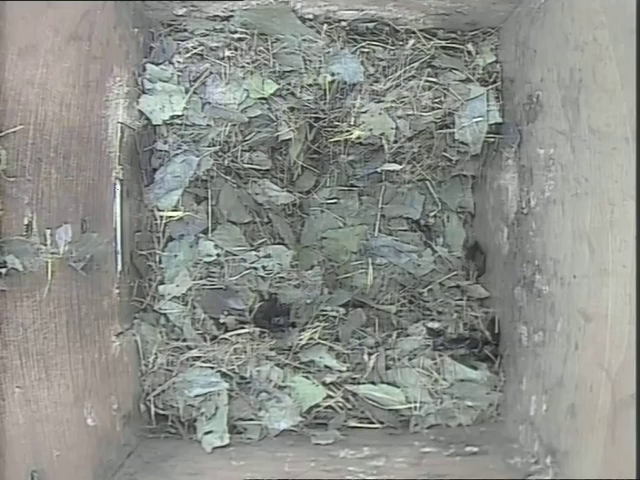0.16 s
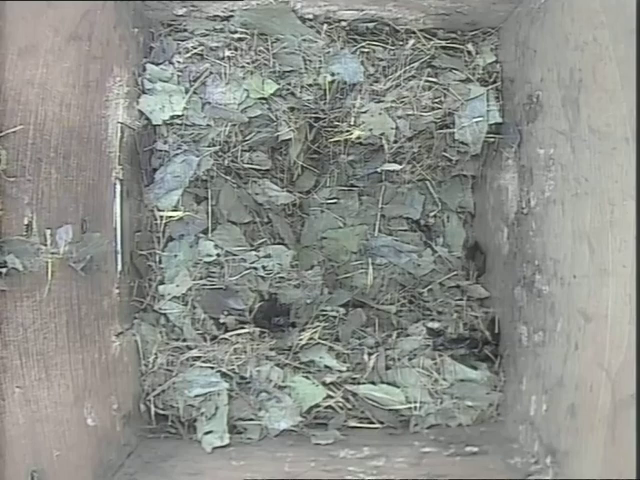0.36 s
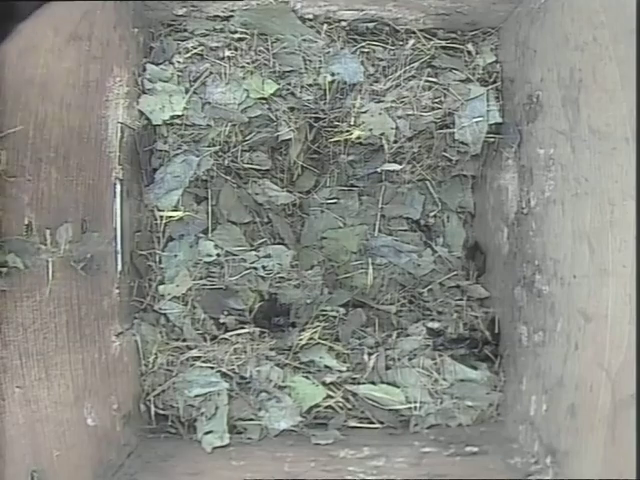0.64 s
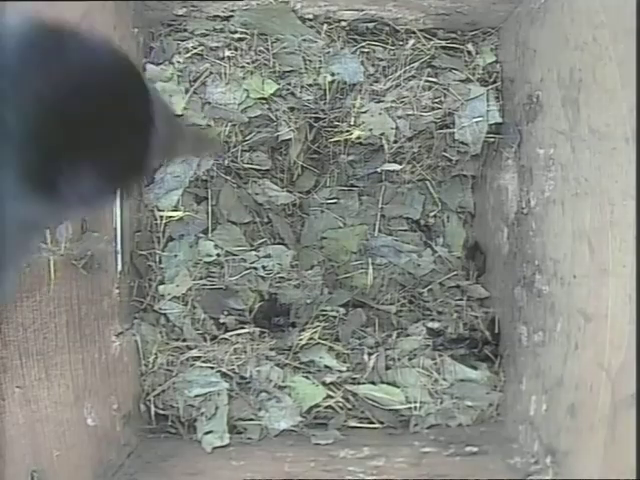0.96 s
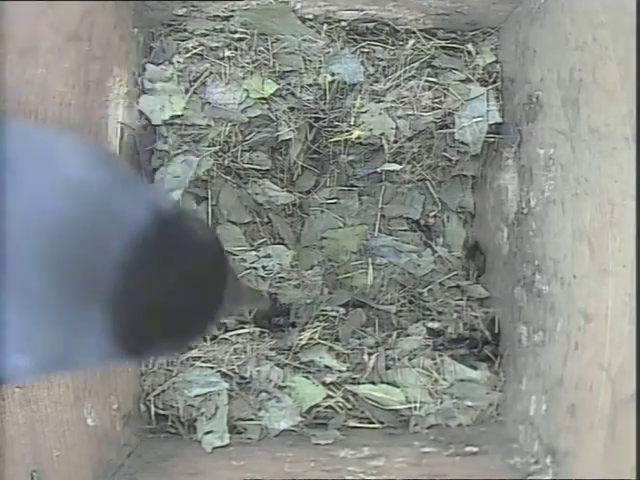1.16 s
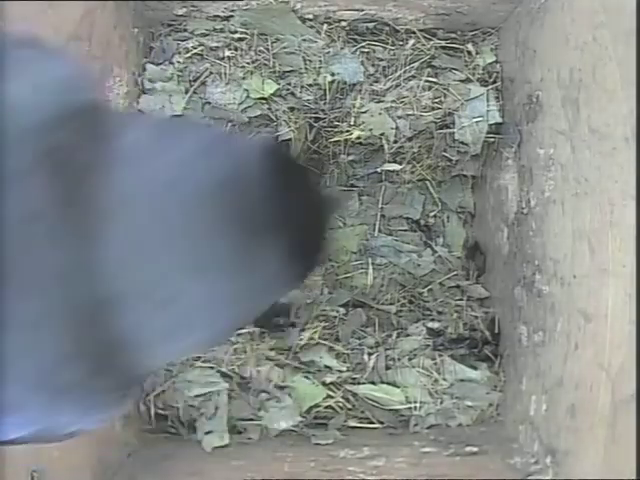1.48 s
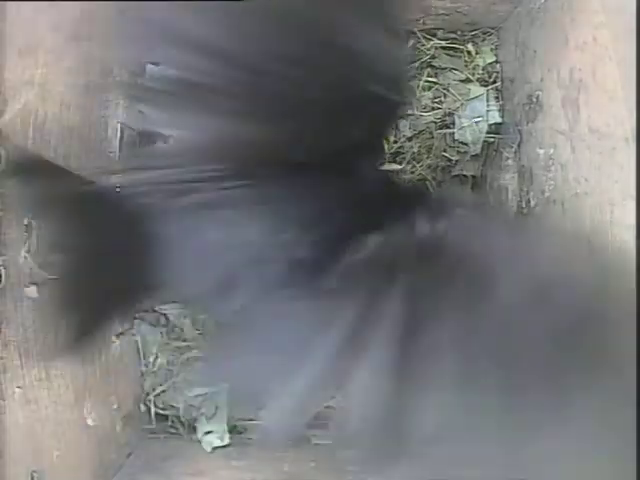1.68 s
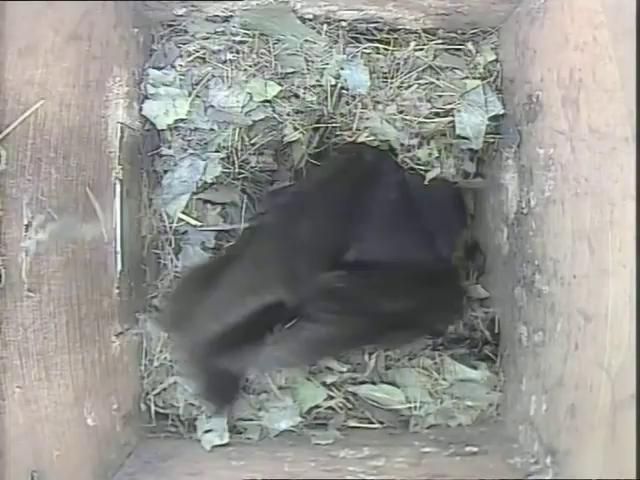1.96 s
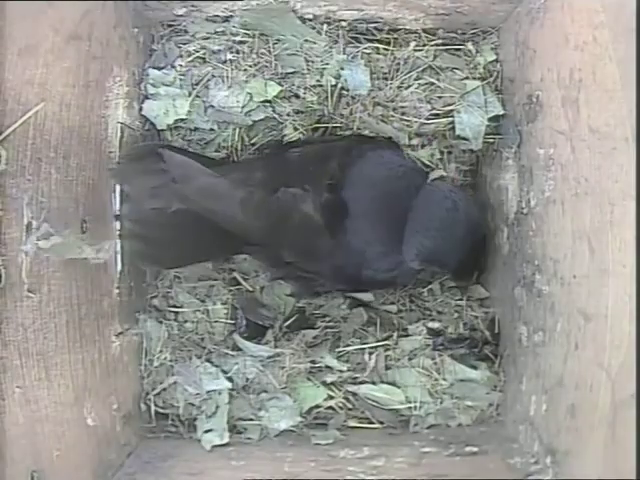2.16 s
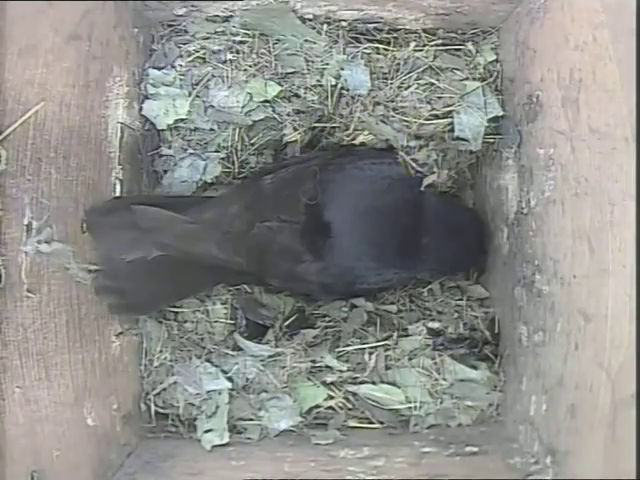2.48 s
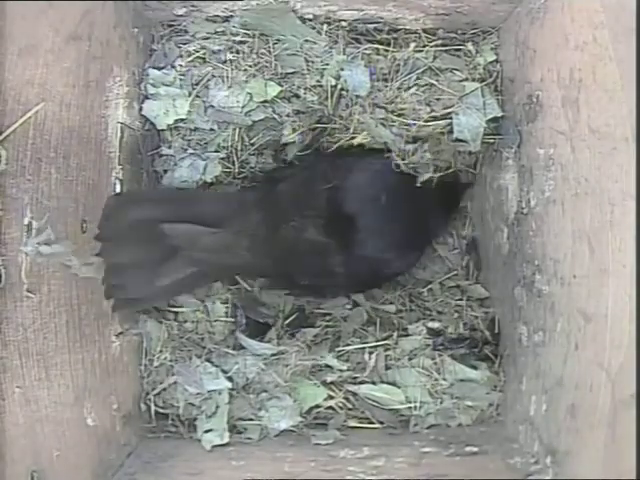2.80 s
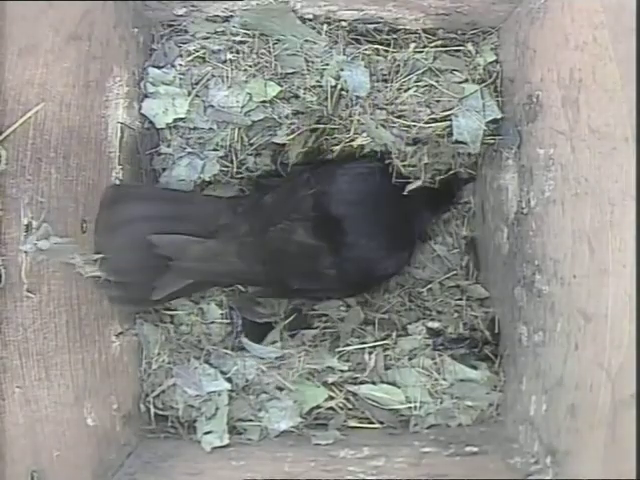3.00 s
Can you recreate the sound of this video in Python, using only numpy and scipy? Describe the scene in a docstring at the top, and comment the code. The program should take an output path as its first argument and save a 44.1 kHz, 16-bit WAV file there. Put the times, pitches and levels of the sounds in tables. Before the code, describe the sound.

A bird scrabbles into a small wooden nest box. After a brief initial silence, a sharp claw scratch and knock come at 0.25 s, then lighter scratches and soft thumps around 0.65-0.95. The loudest crackling flurry of claws, wings and dry leaves runs 1.45-1.95, with low body knocks. It settles, with small rustles near 2.3 and 2.9-3.1. Faint rising chirps and whistles outside until 1.45; steady hiss and rumble.

```python
"""Inside a wooden nest box: a bird lands at the hole, scrabbles in, flaps down onto dry leaves and settles.
Claws, feathers and leaves are showers of tiny clicks that ring the air and the thin walls of the box.
Knocks of feet and body are rough pushes that set low tones swinging and dying away.
Small birds chirp outside: gliding, fluttering sine notes with scattered echoes.
A cheap camera microphone under the lid adds hiss and rumble, made from filtered noise, and a constant offset."""
import sys
import numpy as np
from scipy import signal
from scipy.fft import rfft, irfft
from scipy.io import wavfile
from scipy.ndimage import uniform_filter1d

SR = 44100
rng = np.random.default_rng(int(sys.argv[2]) if len(sys.argv) > 2 else 0)


def to_wav(s):
    """Save 16-bit WAV."""
    ch = np.atleast_2d(s).T  # columns
    pcm = np.round(np.clip(ch, -1, 1) * 32767)  # PCM
    wavfile.write(sys.argv[1], SR, pcm.astype(np.int16))


def elevation(decibels):
    """Turn decibel levels (scalar or array-like) into linear amplitude ratios."""
    levels = np.asarray(decibels, float)
    return 10 ** (levels / 20)


N = 138474  # length in samples
BEFORE_S = 0.06  # time from the start of a swell to its peak


def unit(x):
    """Scale to rms 1."""
    return x / np.sqrt(np.mean(x ** 2))


def shape(x, db_of_hz):
    """Colour a sound by a gain in dB that depends on frequency."""
    hz = np.maximum(np.fft.rfftfreq(len(x), 1 / SR), 1)
    return irfft(rfft(x) * elevation(db_of_hz(hz)), len(x))


def points(table):
    """Gain in dB drawn through (Hz, dB) points, straight over log frequency."""
    hz, db = np.array(table, float).T
    return lambda f: np.interp(np.log(f), np.log(hz), db)


def curve(table, axis):
    """One column of a table as a curve over time."""
    rows = np.array(table, float)
    return np.interp(np.arange(N) / SR, rows[:, 0], rows[:, axis])


def add(out, at_s, x):
    """Mix a sound in at a time."""
    i = int(at_s * SR)
    out[i:i + len(x)] += x[:len(out) - i]


def ring(x, hz, width_hz):
    """One resonance, gain 1 at the centre."""
    return signal.lfilter(*signal.iirpeak(hz, hz / width_hz, fs=SR), x)


def walls(x):
    """The thin walls ring at their own pitches when rubbed or driven by noise."""
    # ringing walls: f/Hz, width/Hz, level/dB
    wall_modes = [(1255.7, 32, 2.5), (1427, 167, 7)]
    out = 0
    for hz, width_hz, db in wall_modes:
        keep_noise_level = np.sqrt(SR / np.pi / width_hz / 2)  # flat noise stays as strong as it was
        out = out + elevation(db) * ring(x, hz, width_hz) * keep_noise_level
    return out


def box_air(x):
    """Direct sound plus the standing waves of the air in the box."""
    # air resonances: f/Hz, width/Hz, level over the direct sound/dB
    air_modes = [(2312, 90, 1), (2880, 120, 6.5), (3170, 90, 0), (3574, 160, 1), (4600, 140, 0),
                 (5010, 320, 3), (6734, 640, -4)]
    return x + sum(elevation(db) * ring(x, hz, width_hz) for hz, width_hz, db in air_modes)


def grains(size):
    """Dense tiny clicks of uneven strength over some steady noise, as rough surfaces give when they rub."""
    clicks_per_s, spread_db, noise_share = 7000, 2.2, 0.35
    hit = rng.random(size) < clicks_per_s / SR
    strength = rng.standard_normal(size)
    boost_db = spread_db * np.minimum(rng.exponential(size=size), 2)
    return unit(hit * strength * elevation(boost_db) + noise_share * rng.standard_normal(size))


def swell(half_s):
    """Bell-shaped rise and fall, quicker up than down; the peak lies at BEFORE_S."""
    t = np.arange(6144) / SR - BEFORE_S
    side_s = max(half_s, 1e-3) * np.where(t < 0, 0.94, 1.3)
    return np.exp(-(t / side_s) ** 2)


def floor():
    """Hiss, outdoor noise ringing the walls, and a rumble that swells and sinks."""
    # colour of the steady noise: f/Hz, relative level per Hz/dB
    floor_colour = [(15, -36), (25, -8.5), (93, -6), (278, -12.5), (306, -12), (584, -18), (673, -19.5),
                    (1450, -22.5), (1670, -27.5), (7500, -36), (9750, -69), (16500, -120)]
    # strength of the bass: t/s, level/dB
    rumble_level = [(.12, -58.5), (1.5, -59.5), (1.6, -55.5), (1.8, -58.5), (1.88, -51), (2.0, -60),
                    (3.0, -61), (3.14, -55)]
    noise = unit(shape(rng.standard_normal(N), points(floor_colour))) * elevation(-57)
    low = signal.sosfiltfilt(signal.butter(2, 200, fs=SR, output="sos"), noise)
    hiss = noise - low
    rumble = unit(low) * elevation(curve(rumble_level, axis=1))
    outdoors = walls(rng.standard_normal(N)) * elevation(-71.5)
    return hiss + rumble + outdoors


def rustle():
    """Feathers and dry leaves: a flickering bed of grains that follows the bird's stirring."""
    # stirring: t/s, level before flicker and tilt/dB, bright half over dark half/dB
    stirring = [(.12, -66.5, -7), (.23, -51, -3), (.29, -63, -8), (.62, -59.5, -6), (.7, -51, -5),
                (.85, -55.5, -5), (.98, -59, 10), (1.03, -58.5, -5), (1.16, -58.5, -3.5),
                (1.2, -60.5, -6.5), (1.34, -57, -8), (1.5, -46.5, 0.5), (1.58, -46.5, -2), (1.8, -47.5, 2),
                (1.95, -49, -0.5), (2.05, -62.5, 10), (2.07, -62.5, 1), (2.34, -56, -2.5), (2.37, -66, -1),
                (2.8, -68, -5.5), (2.88, -53, -3), (2.95, -62.5, -2), (3.0, -51, -4.5), (3.14, -52, 0.5)]
    # colour of the grains: f/Hz, relative level per Hz/dB
    rustle_colour = [(530, -34.5), (900, -16.5), (1270, -12.5), (2590, -12.5), (4810, -8.5), (7500, -10),
                     (9750, -13), (16500, -120)]
    bed = unit(box_air(shape(grains(size=N), points(rustle_colour))))
    dark = signal.sosfilt(signal.butter(2, 4000, fs=SR, output="sos"), bed)
    bright = bed - dark
    slow_noise = uniform_filter1d(uniform_filter1d(rng.standard_normal(N), size=400), size=400)
    flicker_db = 1.6 * unit(slow_noise)
    level = elevation(curve(stirring, axis=1) + flicker_db)
    tilt_db = curve(stirring, axis=2)
    in_air = level * (dark * elevation(-tilt_db / 2) + bright * elevation(tilt_db / 2))
    in_walls = walls(level * elevation(-17.5) * grains(size=N))
    return in_air + in_walls


def scratches():
    """Claws and feathers: short bursts of grains, each with its own colour, in the air of the box."""
    # bursts: peak t/s, rms level at the peak before the box air/dB, centre f/Hz, half length before skew/s
    bursts = [(0.143, -45.5, 3350, 0.0036), (0.152, -43.5, 3830, 0.0065), (0.201, -49, 3340, 0.0024),
              (0.224, -45, 4950, 0.0024), (0.2503, -28, 4020, 0.0043), (0.256, -34.5, 2160, 0.0049),
              (0.528, -50, 4750, 0.0066), (0.644, -41.5, 4920, 0.0024), (0.667, -50, 4700, .005),
              (0.713, -54, 3350, 0.009), (0.726, -48.5, 5650, .004), (0.748, -44, 4640, 0.0043),
              (0.781, -36.5, 4440, 0.0081), (0.793, -39.5, 4650, 0.0049), (0.811, -51.5, 3680, 0.019),
              (0.937, -43.5, 3940, 0.0065), (1.06, -59, 3100, 0.0087), (1.095, -42.5, 3410, 0.0042),
              (1.107, -45, 4640, 0.0077), (1.146, -50, 4250, 0.003), (1.32, -45.5, 5870, 0.0015),
              (1.371, -41, 3100, 0.0046), (1.402, -47.5, 3100, 0.0027), (1.433, -44, 3340, 0.01),
              (1.452, -35.5, 4540, 0.0055), (1.48, -45, 3200, 0.0066), (1.508, -31, 5800, 0.0028),
              (1.533, -40, 4030, 0.0064), (1.546, -34.5, 4480, 0.0057), (1.559, -30.5, 4930, 0.0062),
              (1.566, -29.5, 3480, 0.0038), (1.593, -36.5, 4820, 0.0024), (1.6, -39, 4600, 0.0064),
              (1.626, -22, 5350, 0.0021), (1.64, -32, 4440, 0.013), (1.654, -27, 5850, 0.004),
              (1.686, -31.5, 4900, 0.0017), (1.692, -37, 4500, 0.0057), (1.718, -35, 4380, 0.011),
              (1.722, -33, 4840, .002), (1.734, -32.5, 4900, 0.0018), (1.867, -34, 6020, 0.017),
              (1.91, -43.5, 5640, 0.021), (2.296, -50.5, 6500, 0.0031), (2.344, -54.5, 2630, 0.003),
              (2.867, -49.5, 5260, 0.0078), (2.883, -52.5, 5600, 0.0067), (3.016, -38.5, 5660, 0.0033),
              (3.102, -45, 4820, 0.0022)]
    out = np.zeros(N)
    for peak_s, db, centre_hz, half_s in bursts:
        env = swell(half_s)

        def colour(f):
            octaves = np.where(f < centre_hz, 0.74, 0.65)  # wider below the centre
            return -6 * (np.log2(f / centre_hz) / octaves) ** 2

        burst = unit(shape(grains(size=len(env)), colour))
        add(out, peak_s - BEFORE_S, elevation(db) * env * burst)
    return unit(box_air(out)) * np.std(out)  # the resonances leave the overall level alone


def rubs():
    """Bursts of grains that ring the thin walls."""
    # rubs: peak t/s, rms level at the peak before the walls/dB, half length before skew/s
    rub_list = [(0.145, -54.5, 0.0096), (0.257, -54, 0.012), (0.784, -58, 0.022), (1.325, -51, 0.0013),
                (1.369, -50, 0.0063), (1.431, -52.5, 0.0076), (1.452, -50.5, 0.0075), (1.557, -54.5, 0.011),
                (1.642, -53.5, 0.015), (1.727, -54, 0.012), (1.804, -55, 0.0028), (1.868, -51.5, 0.012)]
    out = np.zeros(N)
    for peak_s, db, half_s in rub_list:
        env = swell(half_s)
        add(out, peak_s - BEFORE_S, elevation(db) * env * grains(size=len(env)))
    return walls(out)


def rising_chirp():
    """One near-sine note: the wavering pitch climbs, then holds while the sound drops and fades."""
    attack_s, rise_s, hold_s = 0.016, 0.047, 0.056
    from_hz, to_hz, waver_hz = 4400, 6050, 50  # the waver is an rms value
    t = np.arange(int((rise_s + hold_s) * SR)) / SR
    times = [0, attack_s, rise_s, rise_s + 0.0077, t[-1] - 0.01, t[-1]]
    env = np.interp(t, times, [0, 1, 1, elevation(-10), elevation(-10), 0])
    waver = unit(uniform_filter1d(rng.standard_normal(len(t)), size=130))
    hz = np.interp(t, [0, rise_s], [from_hz, to_hz]) + waver_hz * waver
    return env * np.sin(2 * np.pi * np.cumsum(hz) / SR)


def whistle(length_s, from_hz, to_hz):
    """One sine note that glides evenly between two pitches, with soft ends."""
    n = int(length_s * SR)
    hz = np.linspace(from_hz, to_hz, n)
    return signal.windows.tukey(n, 0.4) * np.sin(2 * np.pi * np.cumsum(hz) / SR)


def chirps():
    """Birds outside: near-sine notes, fluttering in level and smeared by scattered echoes."""
    # rising chirps: start t/s, peak level before flutter and echo/dB
    rising_list = [(0.15, -55.5), (0.323, -54.5), (.508, -54.5), (0.686, -55.5)]
    # whistles of other birds: start t/s, length/s, start f/Hz, end f/Hz, peak level before flutter and echo/dB
    whistle_list = [(1.217, .022, 5500, 5280, -55), (1.236, .064, 5270, 5240, -54.5),
                    (1.012, .14, 7400, 7350, -66), (1.358, .04, 6200, 4700, -55),
                    (1.396, .035, 4700, 4650, -56)]
    out = np.zeros(N)
    for start_s, db in rising_list:
        add(out, start_s, elevation(db) * rising_chirp())
    for start_s, length_s, from_hz, to_hz, db in whistle_list:
        add(out, start_s, elevation(db) * whistle(length_s, from_hz, to_hz))
    flutter = unit(ring(rng.standard_normal(N), 250, 90))
    out = out * (1 + 0.65 * flutter)
    lag_s = np.arange(8192) / SR
    tail = rng.standard_normal(len(lag_s)) * np.exp(-lag_s / 0.023)
    echo = tail / np.linalg.norm(tail) * elevation(4)
    return out + signal.fftconvolve(out, echo)[:N]


def knocks():
    """Feet and body: rough pushes feed the low modes of the box, weighted a little differently each time."""
    # knocks: push t/s, peak level/dB, half length of the push before skew/s
    pushes = [(0.258, -37.5, 0.004), (0.667, -51, 0.01), (0.796, -43, 0.013), (0.951, -44, 0.013),
              (1.078, -56, 0.0097), (1.568, -35, 0.0019), (1.617, -40, 0.025), (1.692, -41, 0.005),
              (1.734, -44.5, 0.013), (1.86, -42.5, 0.004), (3.015, -53, 0.0087)]
    # modes of the box: f/Hz, level before scatter/dB, time to die away by 60 dB/s
    knock_modes = [(121, -9, .08), (180, -6, .08), (269, 0, .15), (311, -6, .08), (455, -13, .08),
                   (720, -18, .04)]
    scatter_db = 3
    out = np.zeros(N)
    for push_s, db, half_s in pushes:
        env = np.pad(swell(half_s), (0, 6144))  # room to ring on
        t = np.arange(len(env)) / SR
        body = 0
        for hz, mode_db, t60 in knock_modes:
            push = env * uniform_filter1d(rng.standard_normal(len(env)), size=200) ** 2
            decay = np.exp(-np.log(1000) / (t60 * SR))
            swing = signal.lfilter([1], [1, -decay], push)
            phase = 2 * np.pi * rng.random()
            gain = elevation(mode_db + scatter_db * rng.standard_normal())
            body = body + gain * swing / swing.max() * np.sin(2 * np.pi * hz * t + phase)
        add(out, push_s - BEFORE_S, elevation(db) * body / np.abs(body).max())
    return out


def scene():
    """Everything heard inside the box, as one channel."""
    return (floor() + rustle() + scratches() + rubs() + chirps() + knocks())[None]


def band_limit(x):
    """A steep low-pass at the top of the band."""
    return signal.sosfilt(signal.butter(12, 9590, fs=SR, output="sos"), x)


def record(dry):
    """The sound switches on late, rides on a constant offset and loses its treble."""
    start_s, offset = 0.1125, 0.0061
    top_hz, db_per_khz2 = 6853, -6  # the loss grows with the square of the distance above top_hz
    i = np.arange(N)
    switched = ((dry + offset) * (i >= start_s * SR))[0]
    dull = shape(switched, lambda f: db_per_khz2 * (np.maximum(f - top_hz, 0) / 1000) ** 2)
    mix = dull * (i >= start_s * SR - 16)  # 16 samples of filter ringing stay ahead of the start
    return band_limit(mix[None])


dry = scene()
out = record(dry)
to_wav(out)
```